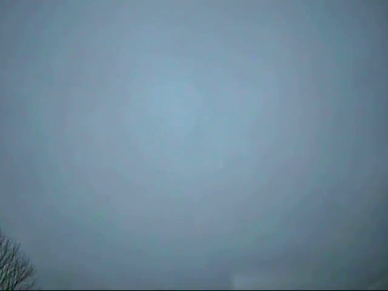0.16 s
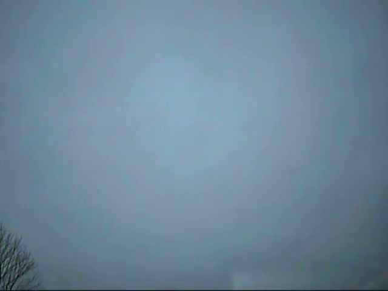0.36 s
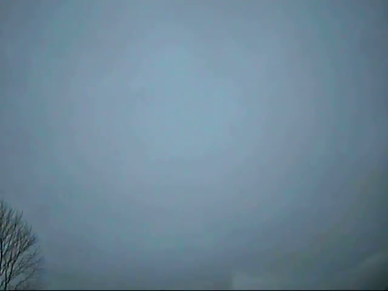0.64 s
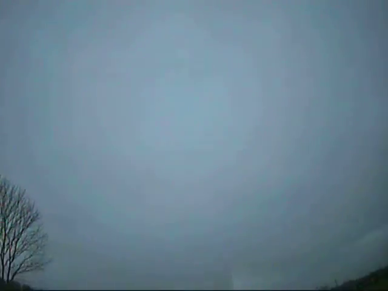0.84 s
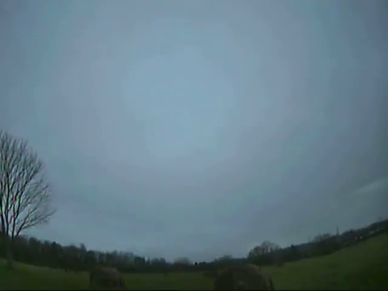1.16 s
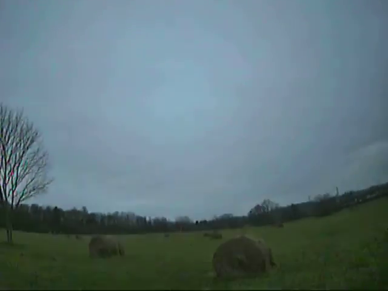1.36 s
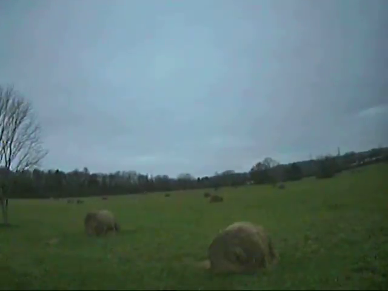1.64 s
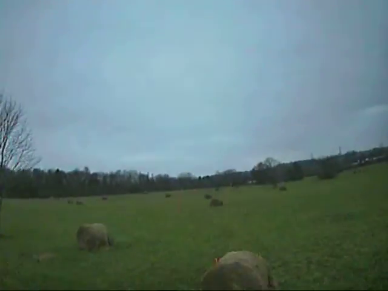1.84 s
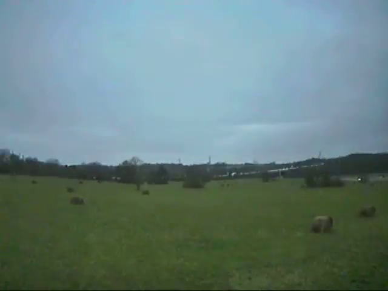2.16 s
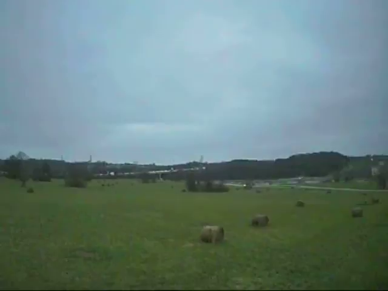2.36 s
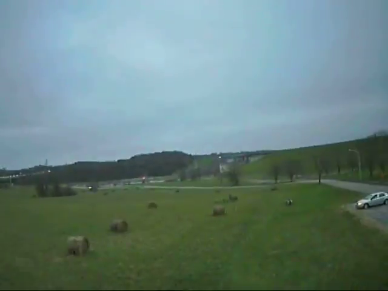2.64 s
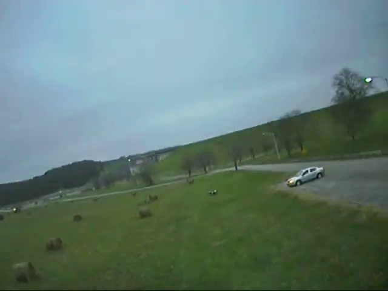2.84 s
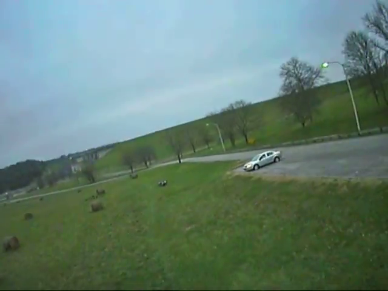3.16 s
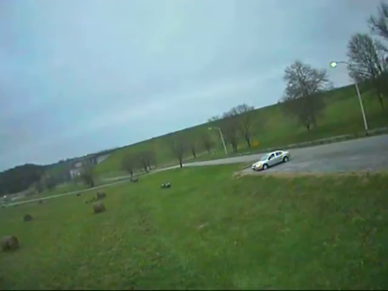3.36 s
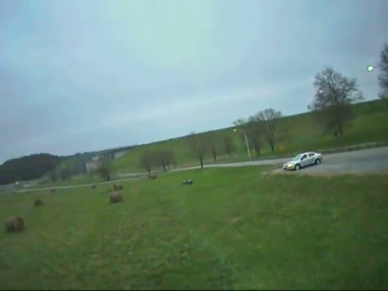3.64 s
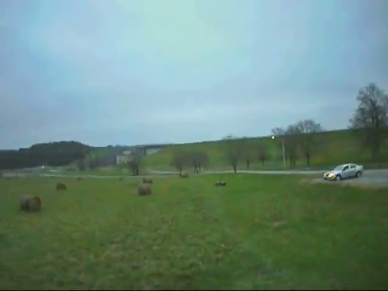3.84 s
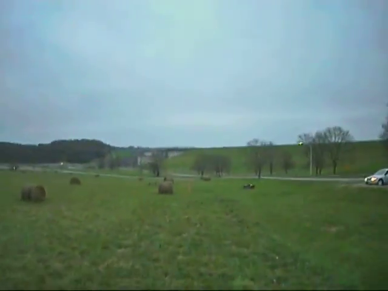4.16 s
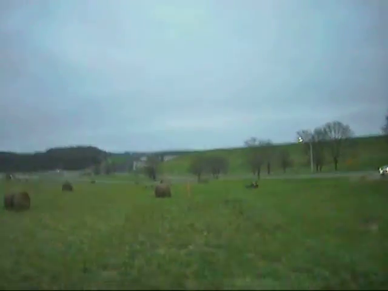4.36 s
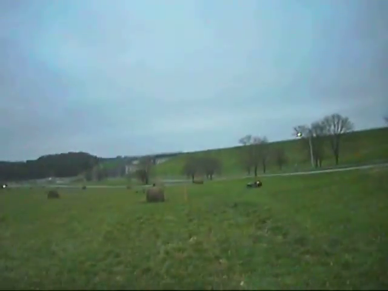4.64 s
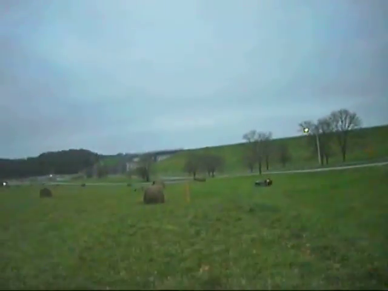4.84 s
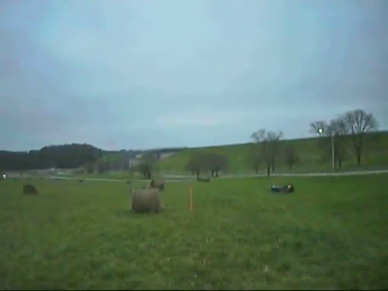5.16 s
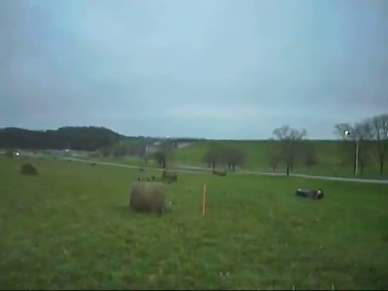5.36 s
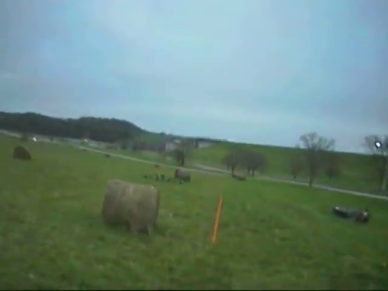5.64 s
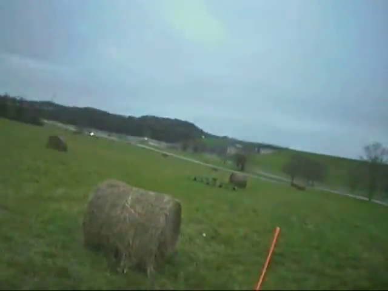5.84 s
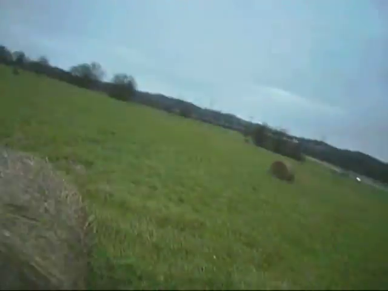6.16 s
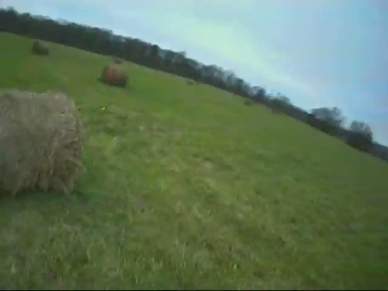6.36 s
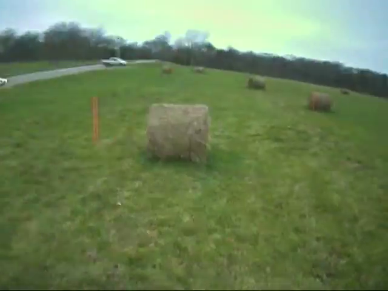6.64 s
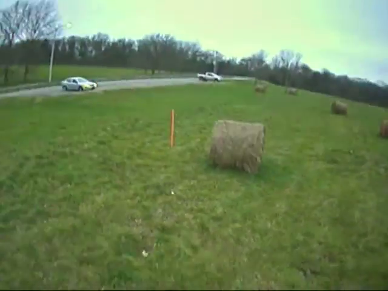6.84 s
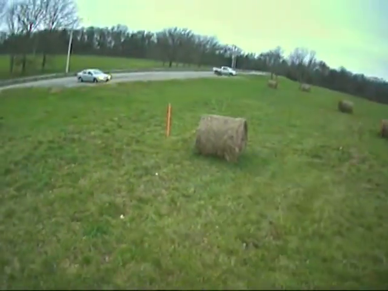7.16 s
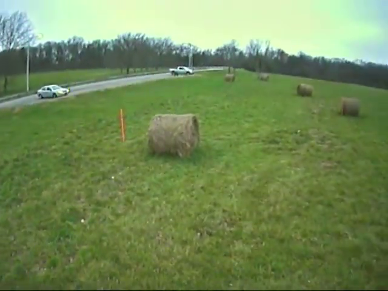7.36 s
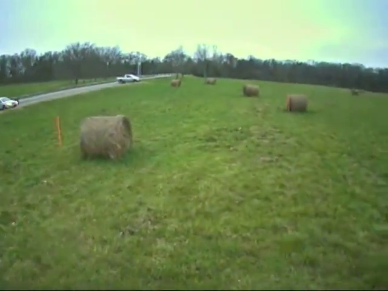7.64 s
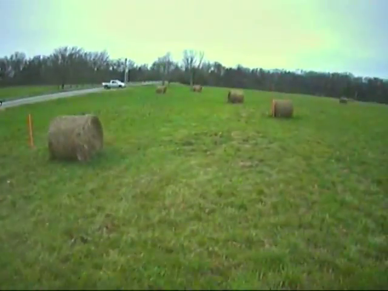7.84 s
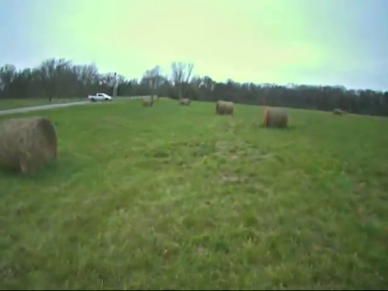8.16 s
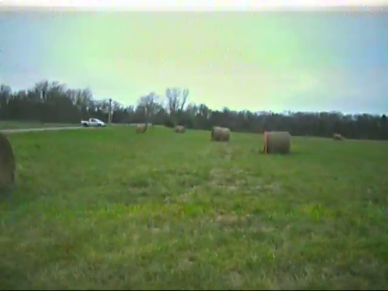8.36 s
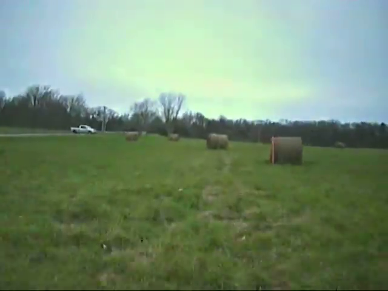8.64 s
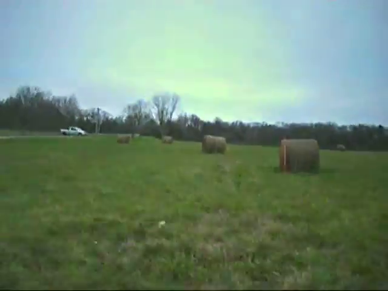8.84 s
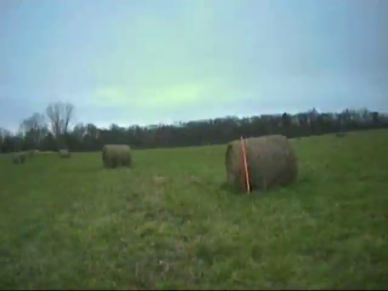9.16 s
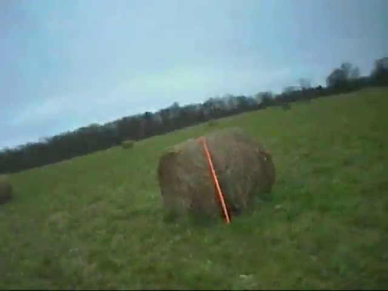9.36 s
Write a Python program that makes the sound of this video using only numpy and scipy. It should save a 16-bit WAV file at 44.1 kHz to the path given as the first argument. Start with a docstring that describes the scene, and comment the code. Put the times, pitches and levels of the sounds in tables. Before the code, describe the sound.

A small racing drone's propellers whine up and down with the throttle, heard on board with wind buffeting and faint static.

```python
"""The rising and falling whine of a small racing quadcopter low over a field, heard from on board. Four two-
blade propellers follow the throttle, beat against each other and split apart in a hard turn. Their wash hisses,
wind buffets the microphone, and the blades rasp briefly in their own wake. It all comes through a narrow-band
audio link that hums and crackles when it overloads; a single sharp tick sounds once."""
import sys
import numpy as np
from scipy import signal
from scipy.fft import rfft, irfft, next_fast_len
from scipy.io import wavfile
from scipy.ndimage import uniform_filter1d

SR = 44100
rng = np.random.default_rng(int(sys.argv[2]) if len(sys.argv) > 2 else 0)


def wav_out(sig):
    """Save sig, one row per channel (or a flat mono array), as 16-bit PCM at SR to the path in sys.argv[1]."""
    wavfile.write(sys.argv[1], SR, np.round(np.clip(np.atleast_2d(sig).T, -1, 1) * 32767).astype(np.int16))


N = 418950
CRUISE_HZ = 360  # blade rate at cruising speed

# colour of the air churned by the blades: f/Hz, relative level/dB
CHURN_SPECTRUM = [(100, 1), (250, 2.5), (500, 1.5), (800, 3), (1150, -1), (1600, -6), (2400, -20),
                  (4500, -43.5)]
# colour of the brighter blade hiss: f/Hz, relative level/dB
HISS_SPECTRUM = [(400, -9), (1000, -1.5), (1600, -2), (2100, 0.5), (2600, -5), (3300, -8), (4000, -14),
                 (4800, -8)]


def from_db(db):
    """Decibels to gain."""
    return 10 ** (np.asarray(db) / 20)


def unit_rms(x):
    """Scale to an rms of 1."""
    return x / np.sqrt(np.mean(x ** 2) + 1e-20)


def envelopes(rows):
    """Join breakpoints (t/s, values..) with straight lines, one envelope per value column."""
    times, *columns = np.transpose(rows)
    return [np.interp(np.arange(N) / SR, times, column) for column in columns]


def swells(rows):
    """Sum bell-shaped swells (t/s, half length/s, heights..), one envelope per height column."""
    t = np.arange(N) / SR
    return sum(np.outer(heights, np.exp(-((t - s) / half) ** 2)) for s, half, *heights in rows)


def swelling_db(rows, *bed_db):
    """Add swells (t/s, half length/s, levels/dB..) in power to bed levels, one dB envelope each."""
    gains = swells([(s, half, *from_db(db)) for s, half, *db in rows])
    return [20 * np.log10(np.hypot(gain, from_db(db))) for gain, db in zip(gains, bed_db)]


def drift(rate_hz):
    """Smooth random modulation of rms 1, drawn every 40 samples."""
    pole = np.exp(-80 * np.pi * rate_hz / SR)
    white = rng.standard_normal(N // 40 + 2002)
    slow = signal.lfilter([1], [1, -2 * pole, pole * pole], white)[2000:]
    return np.interp(np.arange(N) / 40, np.arange(len(slow)), unit_rms(slow))


def coloured_noise(spectrum):
    """Noise of rms 1 shaped by a spectrum (f/Hz, relative level/dB), silent beyond its ends."""
    hz, db = np.transpose(spectrum)
    size = next_fast_len(N)
    log_hz = np.log(np.arange(size // 2 + 1) * SR / size + 1)
    gain = from_db(np.interp(log_hz, np.log(hz), db, left=-np.inf, right=-np.inf))
    return unit_rms(irfft(rfft(rng.standard_normal(size)) * gain, size)[:N])


def blade_phase(blade_hz, hunting, jitter):
    """One cycle per blade pass; the flight controller keeps trimming each motor, so its speed trembles."""
    trembling_hz = blade_hz * (1 + hunting * drift(5.95) + jitter * drift(48.9))
    return 2 * np.pi * (np.cumsum(trembling_hz) / SR + 2 * rng.random())


def blade_levels(blade_hz, load_db):
    """Tone and overtone levels in dB: both grow with tip speed, the overtones also with blade load."""
    octaves = np.log2(blade_hz / CRUISE_HZ)
    return -14 + 11 * octaves, -21 + 12 * octaves + load_db


def propeller(phase, tone_db, overtone_db, tone_flutter_db, overtone_flutter_db):
    """A pressure pulse per blade pass makes a buzzing tone; uneven inflow shakes its partials."""
    # overtones, the half multiples from the unbalanced shaft: multiple of blade rate, relative level/dB
    partials = [(.5, -8), (1.5, -16), (2, 1), (2.5, -10), (3, -3), (3.5, -16), (4, -9.5), (4.5, -24),
                (5, -17), (5.5, -25), (6, -23.5)]
    tone = from_db(tone_db + tone_flutter_db * drift(25)) * np.sin(phase)
    inflow, overtones = drift(25), 0
    for multiple, db in partials:
        flutter_db = overtone_flutter_db * (inflow + drift(34))
        overtones += from_db(db + flutter_db) * np.sin(multiple * phase + 2 * np.pi * rng.random())
    return np.sqrt(2) * (tone + from_db(overtone_db) * overtones)


def motor_whine(blade_hz, phase, flutter_db, roughness):
    """Magnets pull on the stator 14 and 21 times a turn; the frame rings with it."""
    # resonances of the frame: f/Hz, width/Hz, relative level/dB
    frame_modes = [(2150, 400, 0), (2900, 450, -5)]
    whine = 0
    for pulls in (14, 21):
        hz = pulls * blade_hz / 2  # two blade passes to a turn
        ring = sum(from_db(db) / np.hypot(1, 2 * (hz - f) / width) for f, width, db in frame_modes)
        whine += ring * np.sin(pulls * phase / 2 + roughness * drift(90))
    return from_db(flutter_db * drift(30)) * whine


def steering_propeller(blade_hz, phase, load_db):
    """The propeller that steers, with the whine of its hard-working motor."""
    # swells as the blades bite into the cross-flow: t/s, half length/s, tone/dB, overtones/dB
    bites = [(1.35, 0.11, -24, -37), (3.37, 0.18, -24, -23.5), (4.8, .4, -21.5, -24.5),
             (6.02, 0.062, -17.5, -15.5), (6.14, 0.061, -7, -31), (6.36, 0.14, -3, -27),
             (6.68, 0.15, -10.5, -26), (7.95, .3, -19.5, -33)]
    # the motor sings out under strain: t/s, half length/s, level into the frame/dB
    strains = [(1.0, 0.12, -32.5), (2.03, .1, -34), (3.4, 0.095, -44), (3.78, .08, -35)]
    tone_db, overtone_db = blade_levels(blade_hz, load_db)
    tone_db, overtone_db = swelling_db(bites, tone_db - 14, overtone_db - 12.5)
    whine_db, = swelling_db(strains, -47.5)
    blades = propeller(phase, tone_db, overtone_db, tone_flutter_db=-0.4, overtone_flutter_db=0.4)
    return blades + from_db(whine_db) * motor_whine(blade_hz, phase, flutter_db=2.5, roughness=1.0)


def far_propellers(blade_hz, tone_db, overtone_db):
    """The two far propellers turn a little slower and add a faint, wavering chorus."""
    # each against the nearest propeller: speed ratio, level offset/dB
    far_pair = [(0.91, -21.5), (.955, -22.5)]
    chorus = 0
    for ratio, db in far_pair:
        phase = blade_phase(blade_hz * ratio, hunting=.012, jitter=.0065)
        chorus += propeller(phase, tone_db + db, overtone_db + db + 1.5,
                            tone_flutter_db=4.0, overtone_flutter_db=3.5)
    return chorus


def wash(blade_hz, phase, chop_depth):
    """Air churns and hisses off the blades, chopped at the blade rate; the hiss grows with tip speed."""
    # turbulence along the flight, as the strength of the churn: t/s, relative level/dB
    turbulence = [(0, -31.5), (.9, -29), (1.6, -21.5), (1.95, -27.5), (2.35, -18), (2.6, -29),
                  (3.05, -28.5), (3.3, -22), (4.35, -14), (4.5, -6), (5.4, -18.5), (6.05, -4.5), (6.5, -15),
                  (6.8, -5.5), (7.1, -11), (7.4, -21.5), (7.9, -23.5), (8.45, -15), (9, -9), (9.5, -7)]
    # harder hiss as the craft levels out at speed: t/s, half length/s, relative level/dB
    surges = [(5.27, .45, -25)]
    churn_db, = envelopes(turbulence)
    speed_db = 5.5 * np.log2(blade_hz / CRUISE_HZ)
    rough_air_db = .3 * (churn_db + 17.5)  # the hiss follows part of the turbulence's swing
    hiss_db, = swelling_db(surges, -27.5 + speed_db + rough_air_db)
    churn = from_db(churn_db - 6.5 - 0.5 * drift(33)) * coloured_noise(CHURN_SPECTRUM)
    hiss = from_db(hiss_db + 1.57 + 0.26 * drift(57)) * coloured_noise(HISS_SPECTRUM)
    return (churn + hiss) * unit_rms(1 + chop_depth * np.cos(phase))


def wind(flutter_db):
    """Eddies thump on the microphone and roar in the turns."""
    # colour of the low buffet: f/Hz, relative level/dB
    buffet_spectrum = [(12, -5), (25, 1.5), (50, 1), (100, -7.5), (160, -10.5), (300, -20.5), (600, -51)]
    # colour of the roar above it: f/Hz, relative level/dB
    roar_spectrum = [(50, -16), (110, -1.5), (180, -3.5), (300, -4), (500, -12), (1000, -24.5), (2000, -40)]
    # gusts over the steady wind: t/s, half length/s, buffet/dB, roar/dB
    gusts = [(.5, 0.32, -30, -46), (.92, 0.14, -19.5, -24), (2.4, 0.1, -24, -13.5), (2.7, .2, -25, -27),
             (3.25, 0.12, -10, -13), (3.5, .15, -14, -17), (3.85, 0.19, -10.5, -13), (4.5, 0.37, -19, -19),
             (5.7, 0.73, -33, -27), (6.34, 0.081, -11.5, -3.5), (6.8, 0.33, -10, -3.5),
             (7.19, 0.15, -10, -25), (7.48, 0.14, -17, -22), (8.44, 0.087, -11, -12),
             (9.04, .14, -13.5, -8.5), (9.36, 0.14, -11, -14.5)]
    buffet_db, roar_db = swelling_db(gusts, -25.5, -32.5)
    buffet = from_db(buffet_db) * coloured_noise(buffet_spectrum)
    roar = from_db(roar_db) * coloured_noise(roar_spectrum)
    return from_db(flutter_db * drift(27)) * (buffet + roar)


def link_static(level_db):
    return from_db(level_db) * coloured_noise([(100, 1), (1000, 2.5), (3000, 3), (4800, 1)])


def electronics_hum():
    """The electronics hum and whistle faintly at fixed pitches."""
    # steady tones: f/Hz, rms level/dB
    tones = [(250, -45), (350, -45.5), (3930, -58.5), (4070, -58.5)]
    t = np.arange(N) / SR
    return sum(np.sqrt(2) * from_db(db) * np.sin(2 * np.pi * hz * t) for hz, db in tones)


def blade_slap(phase, sharpness):
    """Sinking into their own wake, the blades chop it into a rasp."""
    # brushes with the wake: t/s, half length/s, level/dB
    rasps = [(2.198, 0.043, -18), (2.282, 0.022, -21), (2.401, 0.036, -15.5)]
    swell, = swells([(s, half, from_db(db)) for s, half, db in rasps])
    slaps = unit_rms(np.exp(sharpness * np.cos(phase)))
    wake = coloured_noise(CHURN_SPECTRUM) + from_db(-29) * coloured_noise(HISS_SPECTRUM)
    return swell * slaps * wake


def scene():
    """Four propellers and the moving air, at a fixed distance from the microphone, over link static."""
    # throttle, as the blade rate of the nearest propeller: t/s, f/Hz
    throttle = [(0.0, 134.7), (0.21, 125.7), (0.37, 155.8), (0.55, 157.4), (0.74, 161), (0.87, 250.7),
                (0.95, 294.8), (1.06, 328.7), (1.38, 377.4), (1.77, 364.6), (1.88, 340.5), (2.04, 232),
                (2.14, 261.8), (2.27, 274.6), (2.43, 219.1), (2.56, 209), (2.78, 218.7), (2.93, 163.5),
                (3.12, 171.6), (3.28, 248), (3.36, 285.3), (3.39, 291.3), (3.65, 282.2), (3.81, 320.0),
                (4.15, 355), (4.31, 344), (4.39, 359.4), (4.97, 366.2), (5.11, 358.5), (5.32, 303.2),
                (5.5, 307.9), (5.66, 379.1), (6.0, 413.7), (6.3, 389.5), (6.4, 347.8), (6.61, 365.2),
                (6.98, 233.4), (7.04, 222), (7.2, 245.3), (7.43, 199.5), (7.49, 215.4), (7.65, 299.6),
                (7.73, 335.7), (7.99, 363.7), (8.15, 363.6), (8.41, 416), (8.68, 404.4), (8.81, 425.7),
                (8.99, 408.3), (9.21, 406.7), (9.31, 393.1), (9.5, 330)]
    # blade load, shifting as the craft dives, climbs and turns: t/s, tone boost/dB, overtone boost/dB
    blade_load = [(0, 0, -5), (.7, -3.5, -5), (.88, -5.5, -2.5), (1.02, 1, -.5), (1.85, 1.5, -0.5),
                  (2.5, -3, -3.5), (3.3, 0, -1.5), (4.1, -1, 0.5), (4.3, -2.5, -1.5), (4.6, 2, -0.5),
                  (5.4, -1, 1.5), (6.05, 3, -1.5), (6.45, 8, -1), (6.9, 5.5, -3), (7.45, 1.5, 0.5),
                  (7.75, 1.5, 0.5), (8.15, 0, 0), (8.45, 1, -1), (9.1, 3, -1), (9.5, -0.5, -1.5)]
    # the steering propeller speeds up or slows: t/s, half length/s, change of speed ratio
    manoeuvres = [(.2, 0.63, 0.21), (1.95, .07, .12), (2.09, .09, 0.34), (2.6, 0.36, 0.33),
                  (6.01, .14, -.195), (6.28, .25, -.28), (8.13, .22, -.07), (9.1, .5, -0.021)]
    blade_hz, = envelopes(throttle)
    tone_load_db, overtone_load_db = envelopes(blade_load)
    steering_hz = blade_hz * (.93 + swells(manoeuvres)[0])
    tone_db, overtone_db = blade_levels(blade_hz, overtone_load_db)
    near_phase = blade_phase(blade_hz, hunting=.0012, jitter=.0033)
    steering_phase = blade_phase(steering_hz, hunting=.002, jitter=.004)
    # the nearest propeller's overtones throb each time the tips of the two fall into step
    throb_db = 3.5 * np.cos(near_phase - steering_phase)
    props = propeller(near_phase, tone_db + tone_load_db, overtone_db + throb_db,
                      tone_flutter_db=1.66, overtone_flutter_db=1.37)
    props += steering_propeller(steering_hz, steering_phase, overtone_load_db)
    props += far_propellers(blade_hz, tone_db, overtone_db)
    air = wash(blade_hz, near_phase, chop_depth=0.24)
    air += blade_slap(near_phase, sharpness=0.94) + wind(flutter_db=0.8)
    return (props + air + link_static(level_db=-43))[None]


def record(dry, headroom=0.59, bias=-.04, rail=0.66, gust_hz=200, coupling_hz=42, link_edge_hz=3980):
    """The microphone stage rounds the peaks, the link cuts the treble, and loud swings hit its rail."""
    # a single sharp tick: t/s, level before the last filters/dB
    ticks = [(4.6931, -7)]
    rounded = headroom * np.tanh((dry + electronics_hum()) / headroom)
    # flattened waves sag and overshoot in the coupling capacitor, slow ones most
    coupled = signal.sosfilt(signal.butter(1, coupling_hz, "high", fs=SR, output="sos"), rounded)
    narrow = signal.sosfilt(signal.cheby1(N=12, rp=.1, Wn=link_edge_hz, fs=SR, output="sos"), coupled)
    # gusts use up part of the room left before the rail
    rumble = signal.sosfilt(signal.butter(2, gust_hz, fs=SR, output="sos"), rounded)
    gust_level = uniform_filter1d(uniform_filter1d(np.abs(rumble), size=2205), size=2205)
    room = rail - 0.079 * gust_level
    # the link sits off centre, so downward swings crackle first
    clipped = np.clip(narrow + bias, -room, room) - bias / 2
    for s, db in ticks:
        clipped[:, round(s * SR)] += from_db(db)
    # a gentle roll-off softens the crackle, then a steep one removes the very top
    softened = signal.sosfilt(signal.butter(2, 11500, fs=SR, output="sos"), clipped)
    return signal.sosfilt(signal.cheby1(N=12, rp=.1, Wn=15850, fs=SR, output="sos"), softened)


dry = scene()
out = record(dry)
wav_out(out)
```